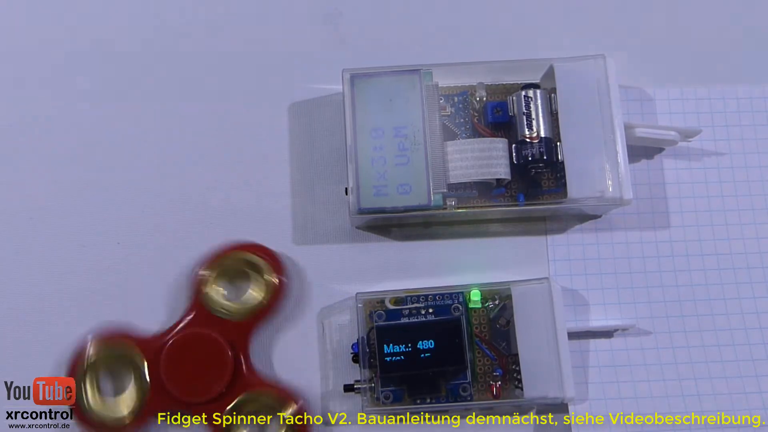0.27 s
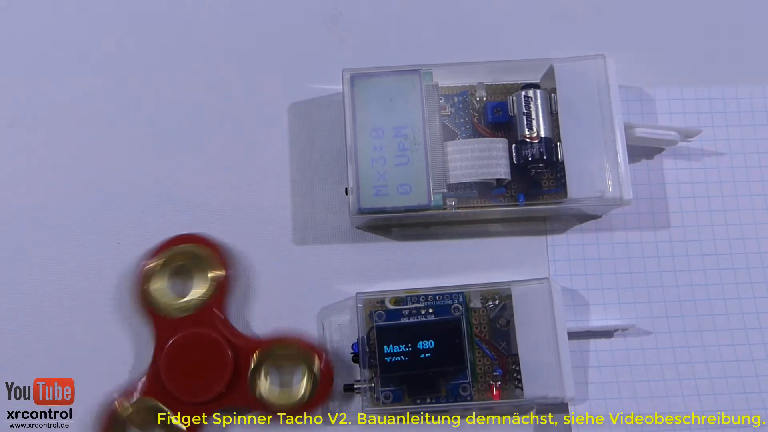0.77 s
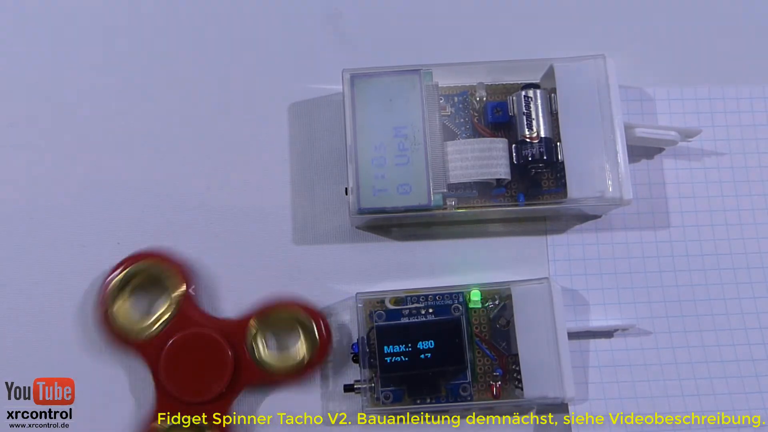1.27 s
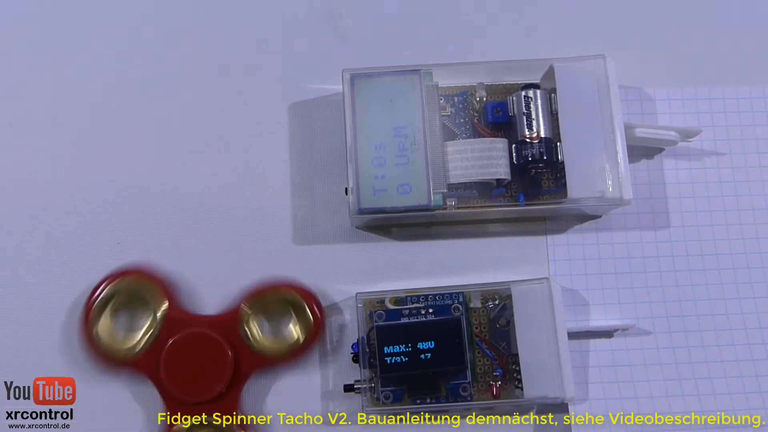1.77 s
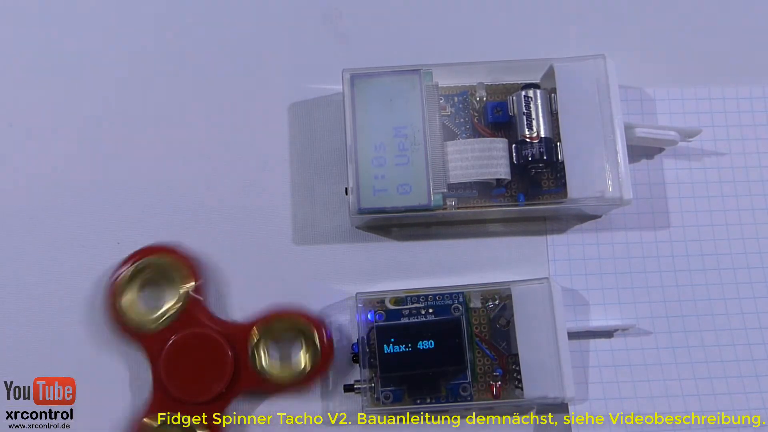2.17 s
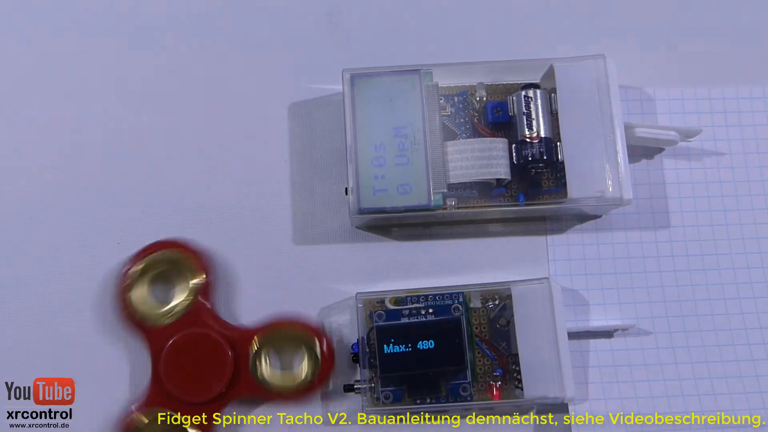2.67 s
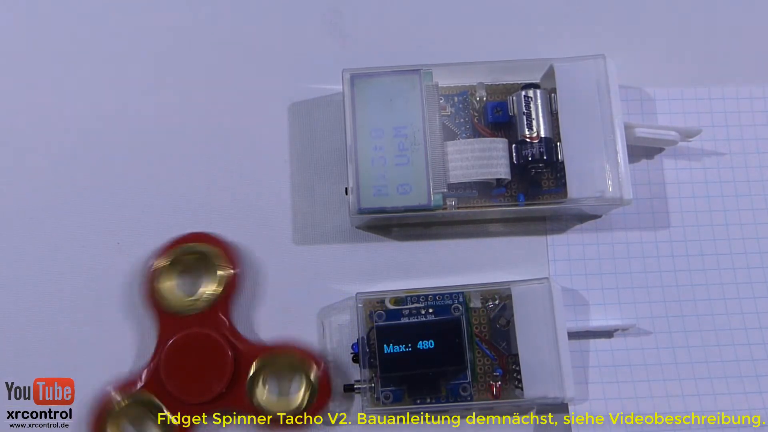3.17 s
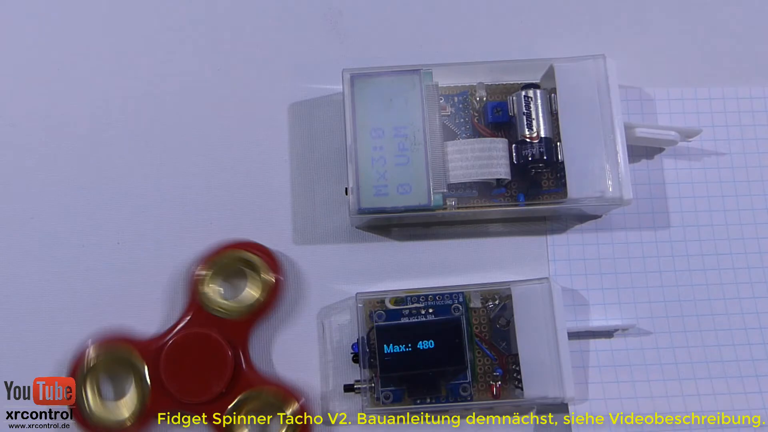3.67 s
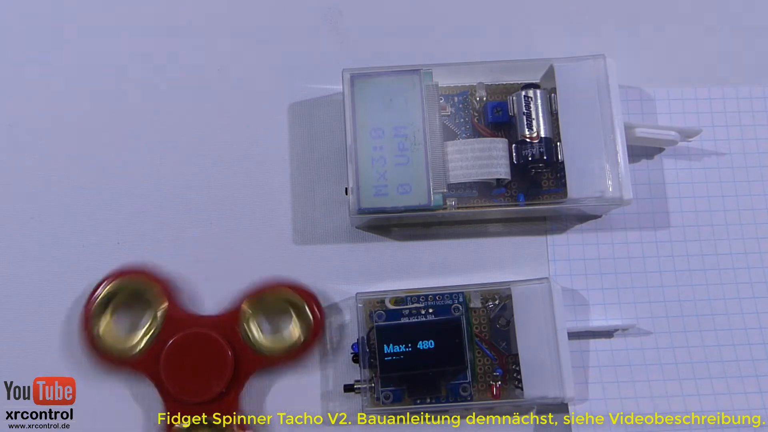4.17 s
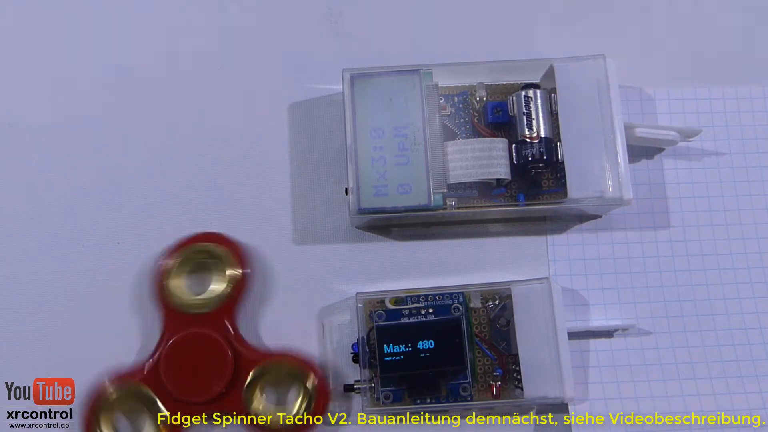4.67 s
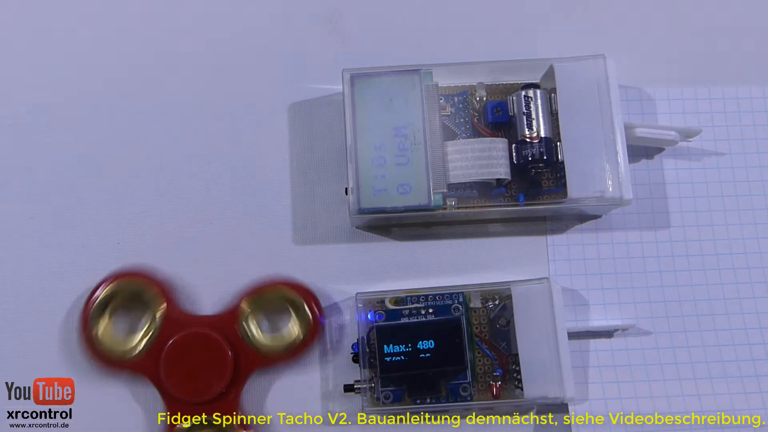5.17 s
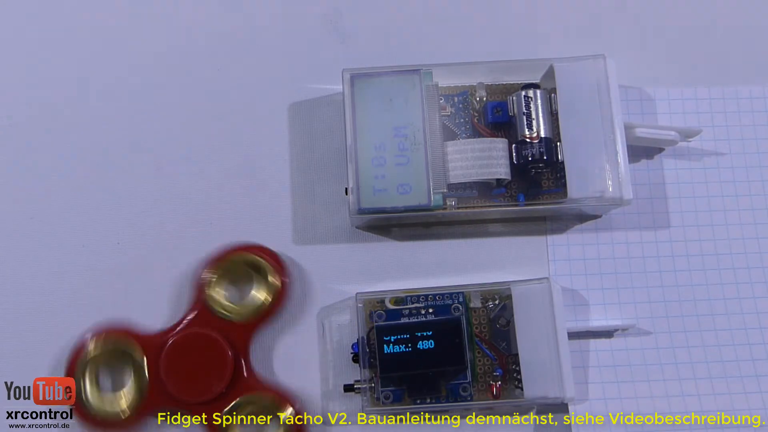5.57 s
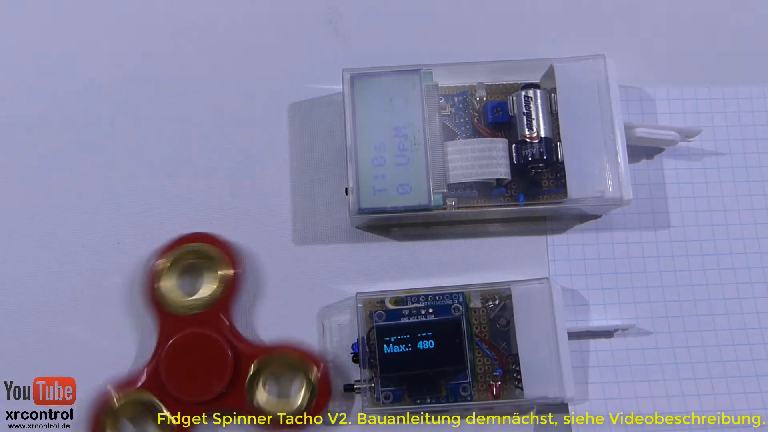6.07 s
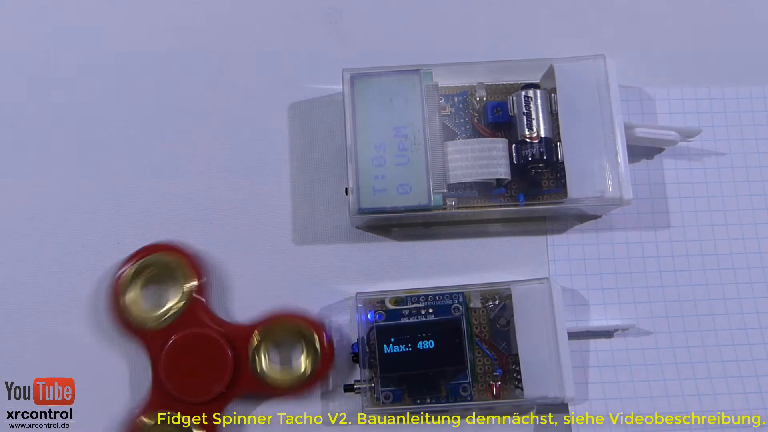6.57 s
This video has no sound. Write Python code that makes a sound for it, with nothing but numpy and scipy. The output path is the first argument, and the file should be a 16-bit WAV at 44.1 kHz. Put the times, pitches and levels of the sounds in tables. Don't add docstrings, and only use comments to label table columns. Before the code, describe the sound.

Close up on a desk indoors, a hand spinner keeps turning with a grainy whir. Small rolling balls knock over a dent, making short low booms in the desk panel, uneven at first and then evenly rapid. The patter slows very gradually and trips briefly a few times. Beneath and above it lie a rumble and thin steel hiss, both slowly fading, with faint room tone behind.

```python
import sys
import numpy as np
from scipy import signal
from scipy.fft import rfft, irfft, next_fast_len
from scipy.io import wavfile

SR = 44100
rng = np.random.default_rng(int(sys.argv[2]) if len(sys.argv) > 2 else 0)


def undo_db(level):
    steps = np.asarray(level, float) / 20
    return 10 ** steps


def bounce(signal):
    frames = np.transpose(np.atleast_2d(signal))
    limited = np.clip(frames, -1, 1)
    pcm = np.round(limited * 32767).astype(np.int16)
    wavfile.write(sys.argv[1], SR, pcm)


N = 300965

# t/s, peak level/dB
STRAY_KNOCKS = [(0.007, -39.5), (0.071, -31), (0.132, -29.5), (0.167, -46), (0.216, -56), (0.253, -33),
                (0.309, -43), (0.342, -29), (0.403, -29.5), (0.434, -34), (0.463, -26), (0.524, -34),
                (0.606, -44), (0.645, -31), (0.706, -35), (0.737, -29.5), (0.798, -28), (0.833, -33),
                (0.889, -43), (0.92, -28), (0.953, -45), (1.009, -33), (3.64, -44), (3.684, -32.5),
                (3.724, -36.5), (3.809, -34), (4.884, -42), (6.77, -52)]
# t/s, added strength/share
KNOCK_ACCENTS = [(1.203, -0.43), (1.252, 0.19), (1.559, 0.34), (1.87, -0.48), (2.13, -0.26), (2.337, -0.099),
                 (2.389, -0.24), (2.494, -0.027), (2.809, -0.0017), (3.125, 0.17), (3.286, 0.88), (3.338, 0.53),
                 (3.39, -0.23), (3.656, -1.5), (3.71, -1.5), (3.817, -1.5), (3.926, 0.3), (4.085, -0.65),
                 (4.301, -0.13), (4.358, 0.033), (4.464, 0.012), (4.9, -1.2), (4.95, -0.048), (5.343, -0.28),
                 (5.506, -0.15), (5.671, 0.072), (5.782, 0.47), (6.228, -0.1), (6.284, -0.22), (6.394, -0.65),
                 (1.05, 0.95), (1.36, -0.005), (1.41, 0.63), (1.82, 0.89), (1.97, 0.15), (2.03, 0.065),
                 (2.6, -0.51), (2.7, 0.046), (2.97, -0.49), (3.23, 0.32), (3.55, -0.65), (3.87, 0.72),
                 (3.98, -0.21), (4.03, -0.051), (4.52, -0.37), (4.63, .15), (4.68, -0.35), (4.74, -0.31),
                 (5.12, 0.024), (5.17, -0.44), (5.84, -0.75), (6.11, 0.45), (6.34, 0.03), (6.45, 0.16),
                 (6.51, -0.24), (6.62, 0.37), (6.68, 0.089), (1.305, 0.3), (3.07, 0.44), (1.1, -0.047)]
# t/s, knock level/dB
SEATING = [(1.0, -3), (1.3, 1.5), (1.55, -0.5), (1.7, -1.5), (2.15, 3.5), (2.5, 2.5), (2.8, 1), (3.2, 0.5),
           (3.5, 1.5), (3.9, -0.5), (4.2, 0.5), (4.5, 4), (4.85, 1.5), (5.3, -1.5), (5.7, 3), (6.0, 0),
           (6.25, 3.5), (6.7, 1)]
# t/s, tilt/(dB per octave)
HARDNESS = [(0.07, 2.5), (.2, -4), (.35, 0), (.46, -1), (.53, 3), (.65, -4), (.74, -6), (.84, -7),
            (.92, -4.5), (1.05, 1.5), (1.3, 0), (2.0, -2), (2.8, 1.5), (3.5, -1), (4.3, .3), (5.0, 2),
            (5.7, 1.5), (6.7, 1)]
# f/Hz, level/dB, t60/s, first swing/sign
PANEL_MODES = [(200.8, 13.2, .06, 1), (217.1, -6.2, .6, 1), (240.5, -.1, .26, -1), (257.1, 7, .3, -1),
               (275.5, -7.2, .35, 1), (296.5, -3.3, .37, -1), (340, -13, .07, -1), (395, -15, .06, -1),
               (440, -18, .06, 1), (470, -16, .09, 1), (540, -16, .1, 1), (575, -21, .08, -1)]
# f/Hz, width/Hz, level/(dB per Hz), left minus right/dB
DESK_MODES = [(193, 16.8, -56.5, 13.5), (236, 28.7, -59.5, 0.5), (260.9, 14.5, -57.5, 0.5),
              (306.7, 30.4, -66.5, -2.5), (338.6, 52.5, -72.5, 0.5), (398, 43, -74, 4), (477, 24, -75, 4),
              (541, 20, -74, -6), (560.3, 41, -77, -2), (668, 44, -82, 3), (787, 179, -80, 0.5),
              (854, 20.6, -72, -1.5), (1014, 32, -95, -1), (1094, 21.4, -76, -1), (1186, 72, -80, 0.5),
              (1402, 35, -82.5, 4), (1463, 18.4, -75, 0), (1564, 24, -83, 3), (1663.4, 35, -76, 5),
              (1806, 62, -80, -5), (1882, 28, -82, 3), (2000, 16, -83, 3), (909, 37, -86.5, 7),
              (1494, 61, -85, -12), (1350, 36, -90.5, 1), (1268, 18, -87.5, 5)]
# f/Hz, width/Hz, level/(dB per Hz), left minus right/dB
BODY_MODES = [(2038, 40, -81, -3), (2106, 18, -82, 0), (2156, 23, -79, -1), (2235, 16, -79, 0),
              (2280, 40, -78, -1), (2389, 131, -75, -1), (2472, 34, -68.5, 0), (2561, 34, -76, -3),
              (2627, 114, -76, -1), (2703, 29, -72, -1), (2785, 37, -71, 0), (2882, 15, -70, -1),
              (2922, 114, -70, -1), (2961, 125, -71, 0), (3084, 19, -81, 0), (3177, 91, -83, 3),
              (3259, 27, -86, 0), (3319, 36, -86, 1), (3393, 30, -85, 2), (3503, 27, -84, 0),
              (3570, 75, -89, 1), (3733, 36, -90, 0)]
# f/Hz, width/Hz, level/(dB per Hz), left minus right/dB
RING_MODES = [(4013, 206, -91, 0), (4294, 118, -89, 0), (4376, 142, -91, 1), (4610, 117, -87, 0),
              (4849, 280, -89, 0), (5265, 274, -89, 0), (5459, 184, -86, 0), (5813, 263, -91, 0),
              (6033, 91, -87, 1), (6296, 419, -93, 0), (6759, 148, -91, 0), (6907, 127, -92, 1),
              (7093, 156, -91, 0), (7298, 158, -93, 0)]
# f/Hz, width/Hz, level/(dB per Hz), left minus right/dB
BALL_MODES = [(7556, 66, -96, 0), (7819, 135, -97, 0), (7985, 70, -96, 0), (8227, 139, -97, 0),
              (8350, 155, -98, 0), (8723, 145, -97, 0), (8971, 84, -99, 0), (9290, 184, -101, 0),
              (9575, 239, -96, 0), (9969, 599, -84, 0), (10061, 749, -85, 0), (10665, 188, -93, 0),
              (10831, 155, -93, 0), (11395, 264, -92, 0), (11727, 120, -89, 0), (11993, 749, -94, 0),
              (12489, 295, -93, 0), (12646, 208, -94, 0), (13155, 299, -99, 0), (13421, 106, -96, 0),
              (13704, 135, -98, 0), (13930, 274, -102, 0), (14329, 140, -99, 0), (14616, 129, -97, 0),
              (14901, 102, -98, 0), (15167, 129, -98, 0), (15488, 51, -101, 0), (15729, 78, -99, 0)]
DESK_THROB = [(0.24, -0.034), (0.04, -0.058), (0.14, 0.044), (0, -0.39), (0.18, -0.35)]
BODY_THROB = [(0.17, -0.97), (0.15, 0.58), (0.023, 0.2), (0.44, 0.12), (0.63, 0.44)]
RING_THROB = [(.15, -0.27), (0.17, 0.25), (0.46, -0.38), (0.41, 0.082), (0.14, -0.048)]
BALL_THROB = [(.4, 0.1), (0.26, -0.2), (0.41, 0.4), (0.091, .01), (0.61, 0.073)]
# t/s, level/dB, length/s
BRUSHES = [(.2, -1.5, .03), (0.457, 4.5, 0.014), (.64, 0, .02), (0.837, 4, .03), (1.02, -2, 0.022),
           (1.117, 4, 0.016), (1.195, 4, 0.026), (1.26, 6, 0.02), (1.39, -1, .03), (1.643, 1, .02),
           (1.927, 6, 0.024), (2.22, -5, .04), (2.502, 1.5, .03), (2.737, 5.5, .02), (3.01, 6, 0.028),
           (3.283, 4, 0.022), (3.4, 6, .02), (3.6, 0, .03), (3.89, -9, 0.018), (4.06, 6, .025),
           (4.146, 4.5, .03), (4.32, -1, .03), (4.52, 4, 0.046), (5.25, 5.5, 0.032), (5.41, -2, 0.029),
           (5.66, 6, 0.024), (5.74, 3.5, .025), (5.927, 1.5, .02), (6.07, 5.5, .025), (6.444, 6, 0.064),
           (6.6, -7, 0.019)]
# t/s, level/dB
FLEX = [(0, -0.5), (.3, -1), (.65, 2), (1.0, 0.5), (1.4, 2.5), (1.7, 0), (2.0, 2), (2.4, -0.5), (2.7, 3),
        (3.0, 0), (3.4, -0.5), (3.8, 2), (4.3, 0.5), (4.65, -1.5), (5.1, .5), (5.9, -1), (6.4, -2),
        (6.75, 1)]
# f/Hz, width/Hz, depth/dB (above 0: no dip)
VALLEYS = [(175, 6.5, -4), (284, 13, -1.5), (317.3, 6.6, -15), (790, 25, -4.5), (940, 22, -2),
           (1047, 28, -9), (1143, 14, -3), (1270, 33, -2), (1547, 16, -16), (1720, 53, -1), (1900, 40, 1),
           (2100, 15, -6), (2070, 22, 0), (2283, 12, -24), (2500, 36, 2.5), (2480, 19, -3), (2606, 11, -6),
           (2840, 38, -5), (2977, 33, -4.5), (3078, 18, 0), (3076, 35, -9), (3360, 19, -1), (3300, 11, -1),
           (3590, 25, 1), (3850, 39, -5), (7560, 43, -7), (7250, 44, -7), (7740, 55, 1), (8030, 110, -14),
           (8400, 68, -1), (8900, 50, -11), (10250, 180, 4), (495, 18, -11), (656, 20, -1), (1404, 15, 0),
           (3330, 40, -3), (10700, 37, 11), (12550, 62, 0), (13270, 70, 3), (13587, 80, -1), (14100, 80, 0),
           (14780, 70, 2), (15500, 50, 7), (1003, 16, 1), (1580, 10, 3), (1600, 8, -6), (1850, 22, -5),
           (2436, 10, -5), (2620, 12, -3), (2690, 10, -6), (3170, 17, -6), (3240, 12, -13), (3570, 30, 0),
           (4360, 50, -3), (9170, 50, -4), (11230, 30, -3), (922, 17, -9), (1367, 22, -2), (588, 11, -5),
           (448, 7.9, -4.5)]
# f/Hz, level/dB
ROOM = [(200, -23), (1200, -20), (2600, -19), (5500, -21), (8500, -55), (11500, -7), (15000, -13)]
# f/Hz, level/(dB per Hz)
FLOOR = [(12, -50), (20, -26), (49, -22), (161, -4), (298, -1.5), (707, -7.5), (1600, -11.5), (2150, -14),
         (2540, -8.5), (3860, -24), (6030, -20.5), (8430, -26), (11800, -25.5), (15600, -29)]

SETTLED_S, GAP_S, GAP_GROWTH_S = 1.0504, .0508, 5.28e-5
CAGE_TURNS, ROTOR_TURNS = 1 / 7, .3805


def passages():
    since_s = np.arange(N) / SR - SETTLED_S
    return (np.sqrt(GAP_S ** 2 + 2 * GAP_GROWTH_S * since_s) - GAP_S) / GAP_GROWTH_S


def knock_train():
    level_db, spread_db, jitter_s, advance_s = -36.9, .6, .001, .0003
    k = np.arange(int(passages()[-1]))
    at_s = SETTLED_S + GAP_S * k + GAP_GROWTH_S * k ** 2 / 2
    at_s = at_s + jitter_s * rng.standard_normal(len(k))
    lap_swing = .27 * np.cos(2 * np.pi * ((ROTOR_TURNS - CAGE_TURNS) * k - .12))
    cage_swing = .14 * np.cos(2 * np.pi * (CAGE_TURNS * k - .02))
    share = 1 + lap_swing + cage_swing
    for odd_s, added in KNOCK_ACCENTS:
        share[np.abs(at_s - odd_s).argmin()] += added
    knock_db = level_db + np.interp(at_s, *np.transpose(SEATING))
    knock_db = knock_db + spread_db * rng.standard_normal(len(k))
    size = undo_db(knock_db) * np.maximum(share, .03)
    stray_s, stray_db = np.transpose(STRAY_KNOCKS)
    clicks = np.zeros(N)
    index = np.round((np.r_[at_s, stray_s] - advance_s) * SR).astype(int)
    clicks[index] = np.r_[size, undo_db(stray_db)]
    return clicks


def ring(clicks, hz, t60_s):
    r = undo_db(-60 / (t60_s * SR))
    w = 2 * np.pi * hz / SR
    return signal.lfilter([0, np.sin(w)], [1, -2 * r * np.cos(w), r * r], clicks + 1e-18)


def knocks(clicks):
    pivot_hz, spread_db = 255, 0.49
    rebound_s, rebound_db, rebound_above_hz = .0191, -8.5, 320
    out = 0
    at = clicks > 0
    lag = int(rebound_s * SR)
    tilt_db = np.interp(np.flatnonzero(at) / SR, *np.transpose(HARDNESS))
    for hz, level_db, t60_s, swing in PANEL_MODES:
        struck = clicks.copy()
        shift_db = spread_db * rng.standard_normal(at.sum())
        struck[at] *= undo_db(level_db + tilt_db * np.log2(hz / pivot_hz) + shift_db)
        if hz > rebound_above_hz:
            struck = struck - undo_db(rebound_db) * np.r_[np.zeros(lag), struck[:-lag]]
        out = out + np.sign(swing) * ring(struck, hz, t60_s)
    return out * undo_db(np.array([[-.2], [.2]]))


def rms_one(x):
    return x / np.sqrt(np.mean(x ** 2) + 1e-20)


def wander(spread_db, rate_hz):
    step = 40
    r = np.exp(-2 * np.pi * rate_hz * step / SR)
    settle = 2000
    coarse = rng.standard_normal(N // step + settle + 2)
    slow = signal.lfilter([1], [1, -2 * r, r * r], coarse)[settle:]
    return np.interp(np.arange(N) / step, np.arange(len(slow)), undo_db(spread_db * rms_one(slow)))


def throb(table):
    k = passages()
    orders = [CAGE_TURNS, 2 * CAGE_TURNS, ROTOR_TURNS, 2 * ROTOR_TURNS, 1]
    return sum(db * np.cos(2 * np.pi * (order * k + turns)) for order, (db, turns) in zip(orders, table))


def contact_noise(clicks, grain_db, flutter_db, sway_db, jolt, jolt_s, late_s):
    grains = rng.standard_normal(N) * wander(grain_db, rate_hz=370)
    r = np.exp(-1 / (jolt_s * SR))
    late_clicks = np.roll(clicks, int(late_s * SR)) / clicks.max()
    after_knock = signal.lfilter([1], [1, -r], late_clicks)
    flutter = wander(flutter_db, rate_hz=51) * wander(sway_db, rate_hz=16)
    return grains * flutter * (1 + jolt * after_knock)


def resonate(x, hz, width_hz):
    r = np.exp(-np.pi * width_hz / SR)
    zeros = np.array([1, 0, -1]) * (1 - r * r) / 2
    return signal.lfilter(zeros, [1, -2 * r * np.cos(2 * np.pi * hz / SR), r * r], x)


def rolling(modes, force, level_db, wander_db, above_hz):
    steady_width_hz = 250
    out = np.zeros((2, N))
    for k, (hz, width_hz, top_db, pan_db) in enumerate(modes):
        tone = resonate(force, hz, width_hz)
        if width_hz < steady_width_hz:
            tone = tone * wander(wander_db, rate_hz=16)
        lean_db = np.clip(pan_db, -3, 3) / 2
        gains = undo_db(np.array([top_db + lean_db, top_db - lean_db]))
        out += np.outer(gains * (-1) ** k, tone)
    high_pass = signal.butter(4, above_hz, "high", fs=SR, output="sos")
    band = signal.sosfilt(high_pass, out[0] + out[1]) / 2
    return out / np.sqrt(np.mean(band ** 2)) * undo_db(level_db)


def desk_rumble(clicks, t):
    force = contact_noise(clicks, grain_db=1.0, flutter_db=-1.16, sway_db=0.26,
                          jolt=0.74, jolt_s=0.0097, late_s=0.00068)
    level_db = -47 - 0.28 * t + throb(DESK_THROB)
    return rolling(DESK_MODES, force, level_db, wander_db=.7, above_hz=620)


def body_whir(clicks, t):
    brush_hz, brush_width_hz = 2920, 1100
    flex_hz, flex_width_hz = 2410, 330
    force = contact_noise(clicks, grain_db=2.0, flutter_db=1.5, sway_db=0.0,
                          jolt=0.06, jolt_s=.005, late_s=.001)
    level_db = -45.5 - 0.22 * t + throb(BODY_THROB)
    body = rolling(BODY_MODES, force, level_db, wander_db=.4, above_hz=2000)
    brush_db = sum(db * np.exp(-.5 * ((t - at_s) / length_s) ** 2) for at_s, db, length_s in BRUSHES)
    brushed = resonate(resonate(body, brush_hz, brush_width_hz), brush_hz, brush_width_hz)
    flexed = resonate(body, flex_hz, flex_width_hz)
    flex_db = np.interp(t, *np.transpose(FLEX))
    return body + (undo_db(brush_db) - 1) * brushed + (undo_db(flex_db) - 1) * flexed


def steel_hiss(clicks, t):
    hiss_db = -54.5 - 0.38 * t
    on_rings = contact_noise(clicks, grain_db=1.0, flutter_db=0.93, sway_db=0.22,
                             jolt=0.22, jolt_s=.005, late_s=.002)
    on_balls = contact_noise(clicks, grain_db=1.5, flutter_db=1.0, sway_db=0.0,
                             jolt=0.6, jolt_s=0.0025, late_s=0.0034)
    rings_db = hiss_db - 2.5 + throb(RING_THROB)
    balls_db = hiss_db - 4.5 + throb(BALL_THROB)
    rings = rolling(RING_MODES, on_rings, rings_db, wander_db=1.2, above_hz=3900)
    balls = rolling(BALL_MODES, on_balls, balls_db, wander_db=1.2, above_hz=3900)
    return rings + balls


def low_cut(x):
    return signal.sosfilt(signal.cheby2(4, 35, 170, "high", fs=SR, output="sos"), x)


def valleys(x):
    hz, width_hz, depth_db = np.transpose(VALLEYS)
    r = np.exp(-np.pi * width_hz / SR)
    poles = np.c_[np.ones(len(r)), -2 * r * np.cos(2 * np.pi * hz / SR), r * r]
    share = 1 - undo_db(np.minimum(depth_db, 0))
    taken = np.outer(share * (1 - r * r) / 2, [1, 0, -1])
    return signal.sosfilt(np.c_[poles - taken, poles], x)


def noise_tail(size, t60_s, start_s):
    t = np.arange(size) / SR
    tail = rng.standard_normal(size) * undo_db(-60 * t / t60_s) * (t > start_s)
    return tail / np.sqrt(np.sum(tail ** 2))


def scatter(x):
    tail = noise_tail(4096, t60_s=.09, start_s=.004)
    treble = signal.sosfilt(signal.butter(4, 4000, "high", fs=SR, output="sos"), x)
    return undo_db(-6) * signal.fftconvolve(treble, tail[None], axes=1)[:, :N]


def colour(x, table, size):
    hz = np.maximum(np.fft.rfftfreq(size, 1 / SR), 1)
    table_hz, table_db = np.transpose(table)
    gain = undo_db(np.interp(np.log(hz), np.log(table_hz), table_db))
    return irfft(rfft(x, size) * gain, size)


def room(x):
    tail = colour(noise_tail(8192, t60_s=.12, start_s=.002), ROOM, size=8192)
    return signal.fftconvolve(x.mean(axis=0), tail)[:N] * np.array([[1], [-1]])


def floor():
    noise = colour(rng.standard_normal((2, N)), FLOOR, size=next_fast_len(N))[:, :N]
    mid, side = rms_one(noise)
    return undo_db(-52.5) * np.array([.6 * mid + side, .6 * mid - side])


def scene():
    t = np.arange(N) / SR
    clicks = knock_train()
    spinner = knocks(clicks) + desk_rumble(clicks, t) + body_whir(clicks, t) + steel_hiss(clicks, t)
    spinner = valleys(low_cut(spinner))
    direct = spinner * undo_db(np.array([[-.15], [.15]]))
    return direct + scatter(spinner) + room(spinner) + floor()


def band_limit(x):
    return signal.sosfilt(signal.butter(12, 15760, fs=SR, output="sos"), x)


def record(dry):
    return band_limit(dry)


dry = scene()
out = record(dry)
bounce(out)
```